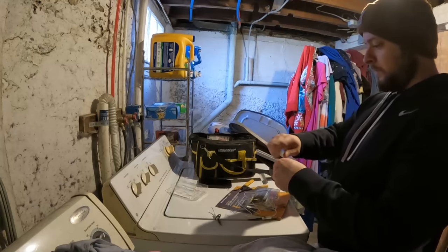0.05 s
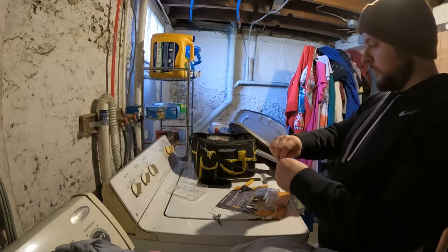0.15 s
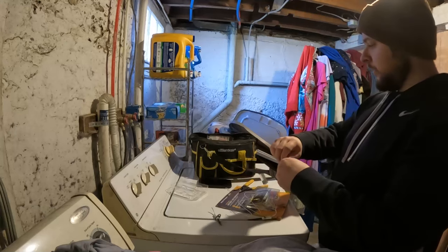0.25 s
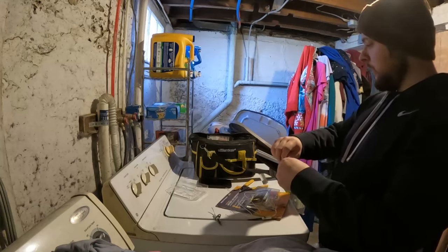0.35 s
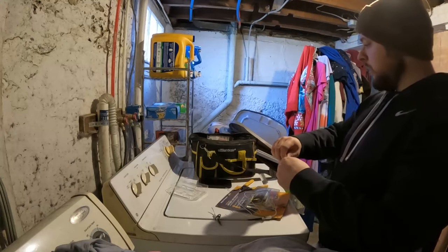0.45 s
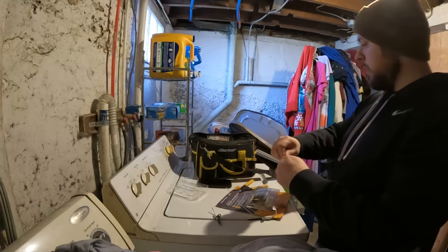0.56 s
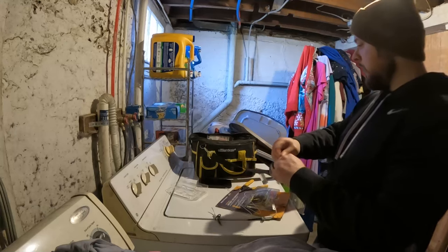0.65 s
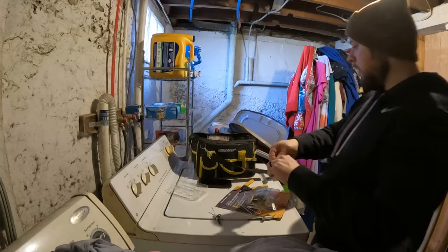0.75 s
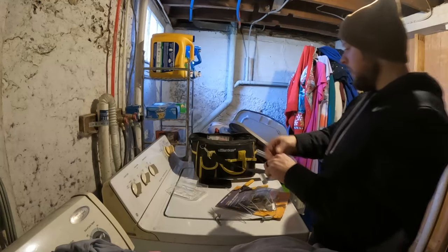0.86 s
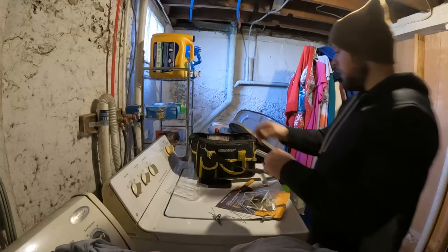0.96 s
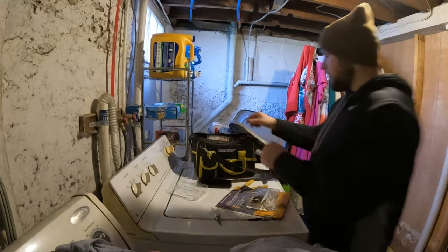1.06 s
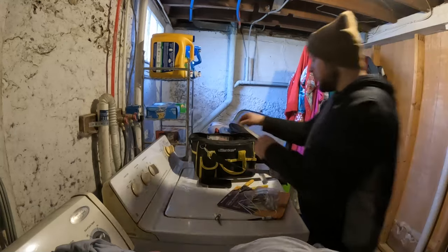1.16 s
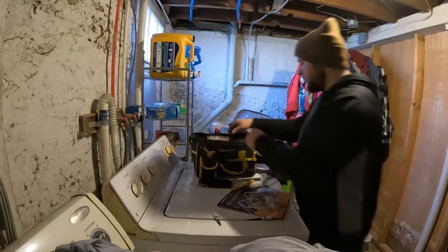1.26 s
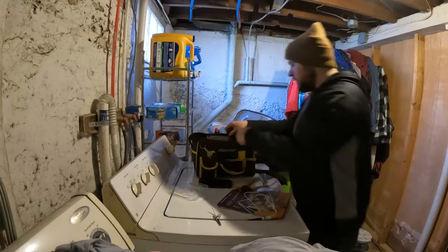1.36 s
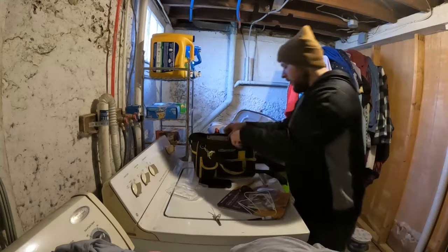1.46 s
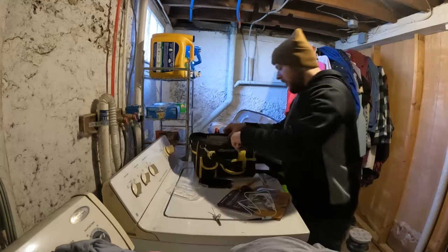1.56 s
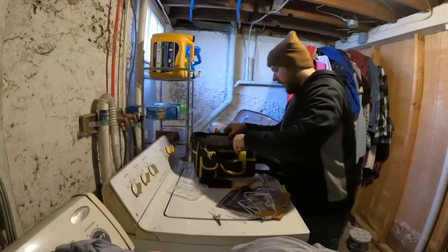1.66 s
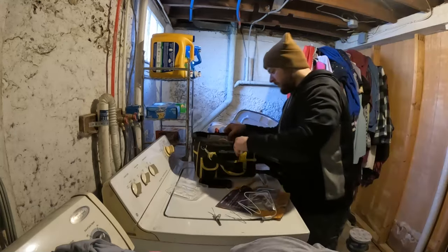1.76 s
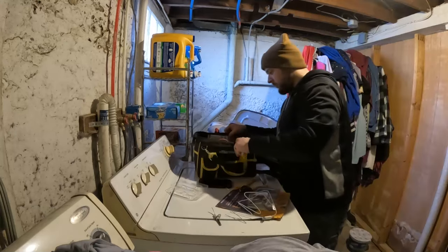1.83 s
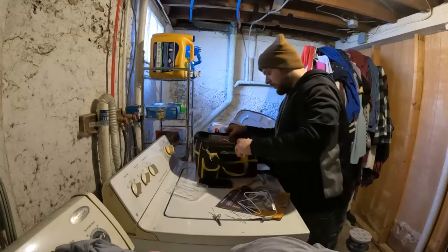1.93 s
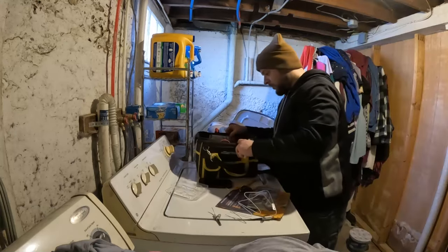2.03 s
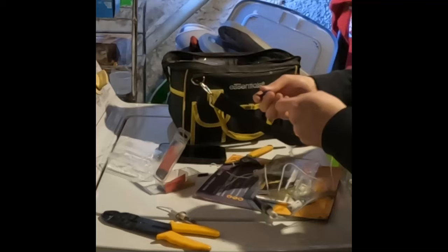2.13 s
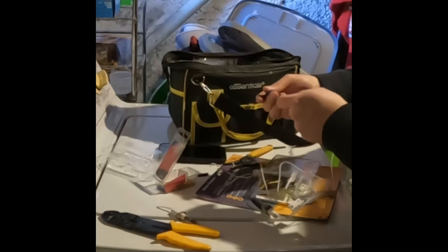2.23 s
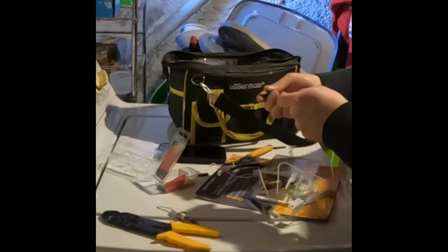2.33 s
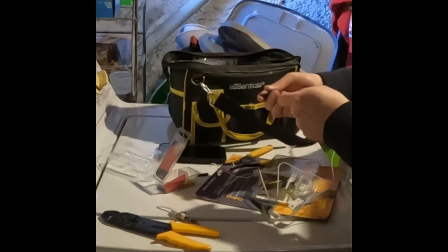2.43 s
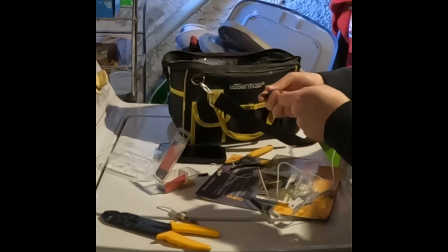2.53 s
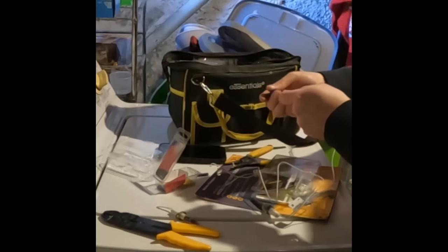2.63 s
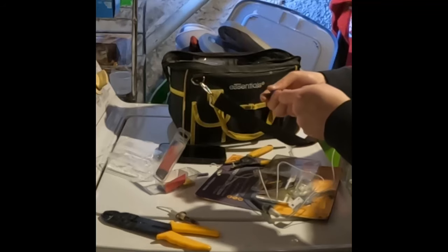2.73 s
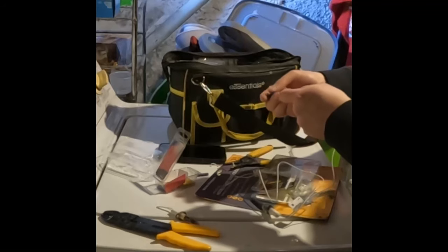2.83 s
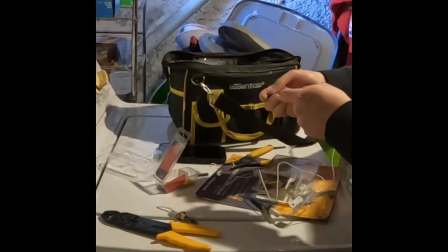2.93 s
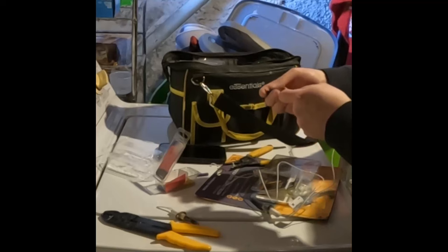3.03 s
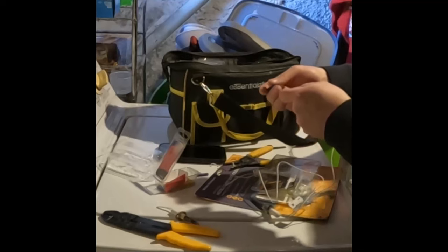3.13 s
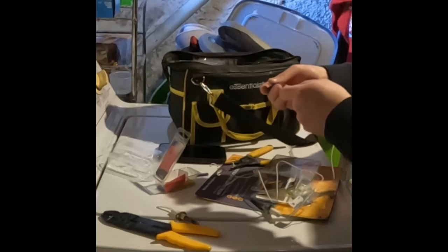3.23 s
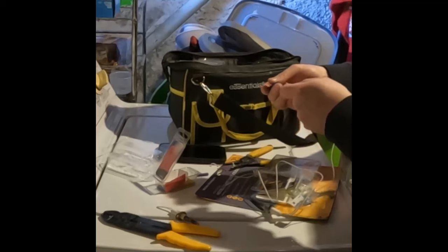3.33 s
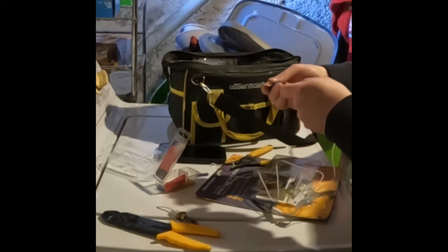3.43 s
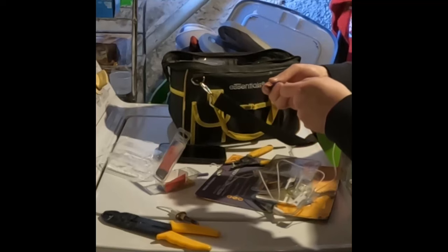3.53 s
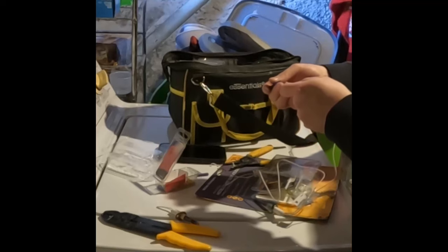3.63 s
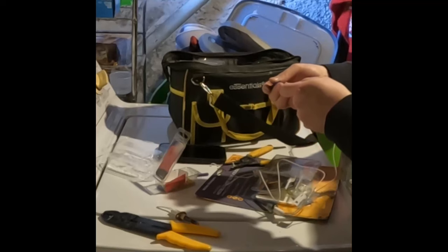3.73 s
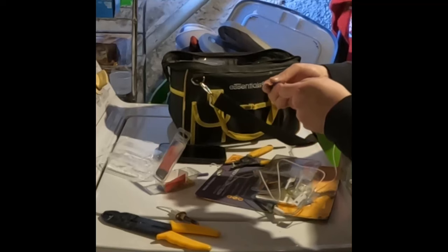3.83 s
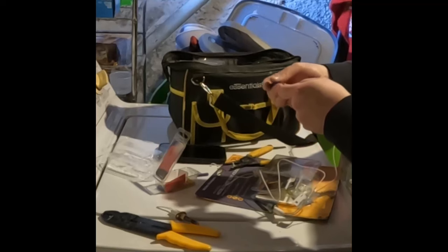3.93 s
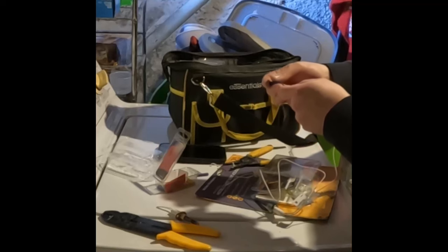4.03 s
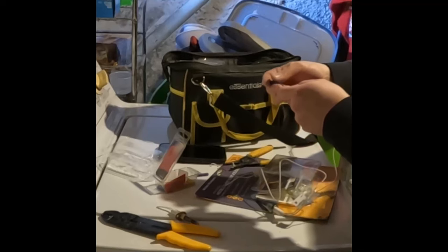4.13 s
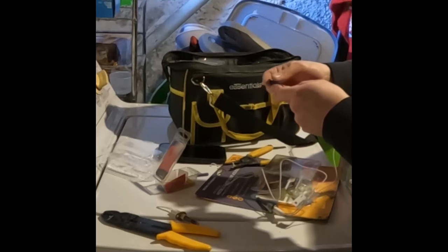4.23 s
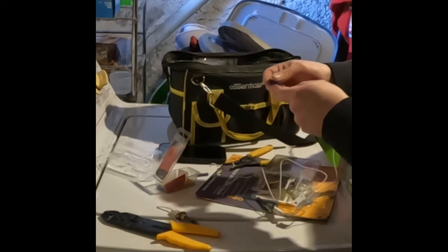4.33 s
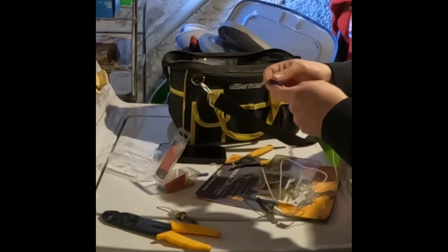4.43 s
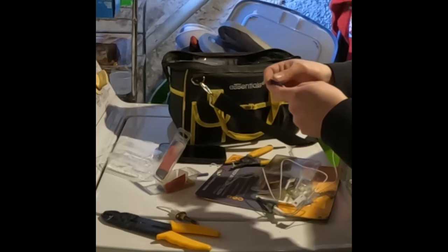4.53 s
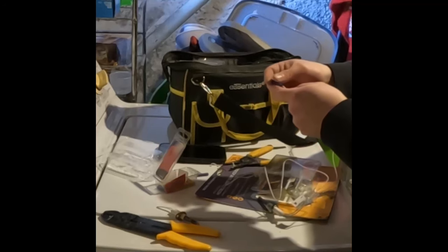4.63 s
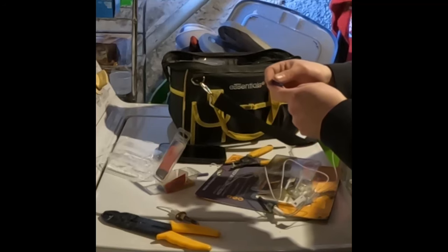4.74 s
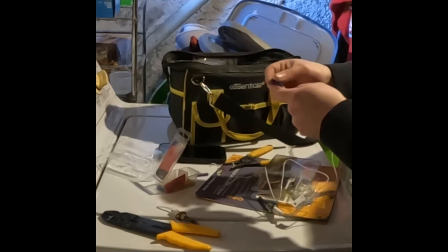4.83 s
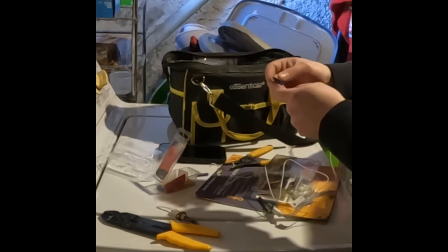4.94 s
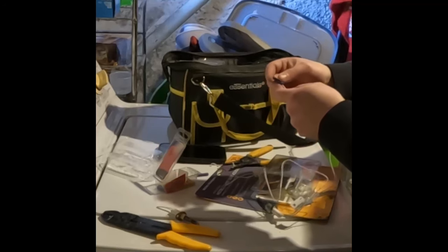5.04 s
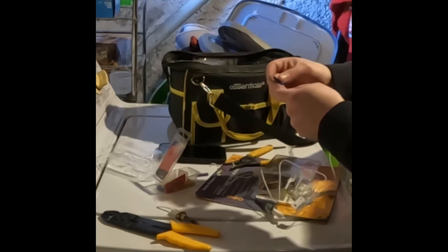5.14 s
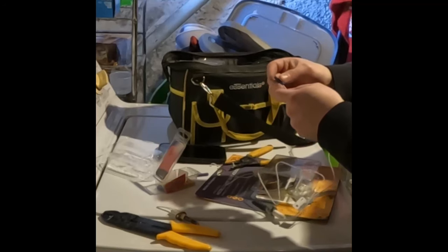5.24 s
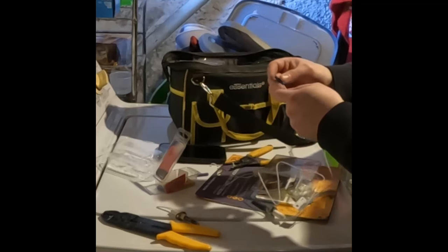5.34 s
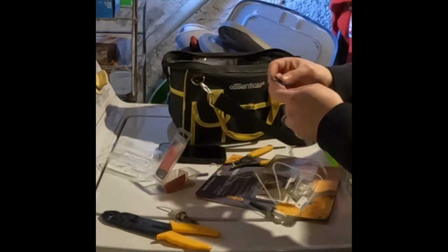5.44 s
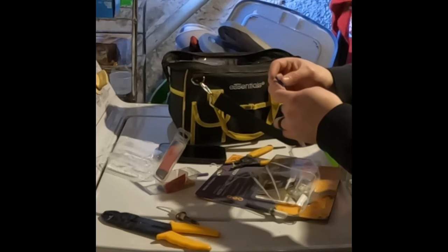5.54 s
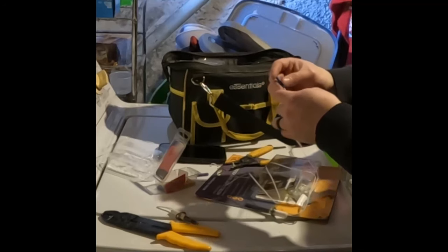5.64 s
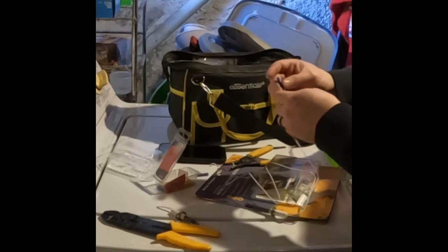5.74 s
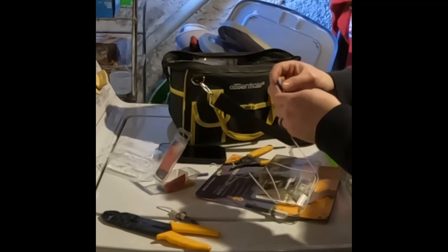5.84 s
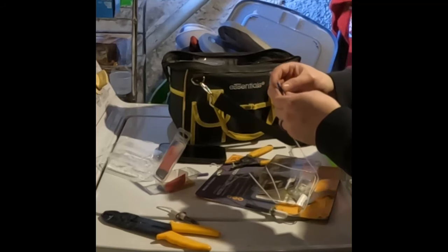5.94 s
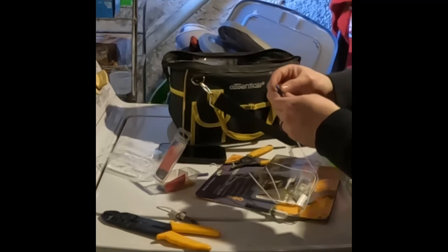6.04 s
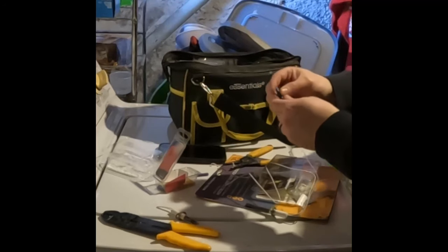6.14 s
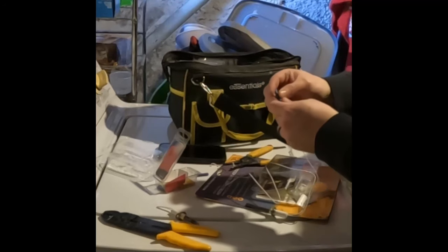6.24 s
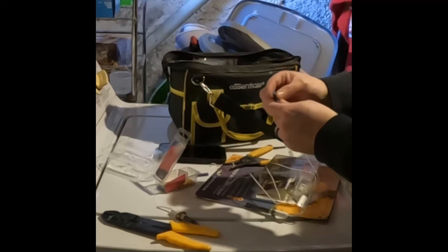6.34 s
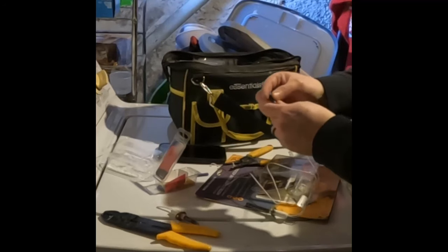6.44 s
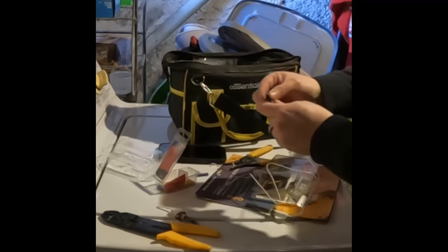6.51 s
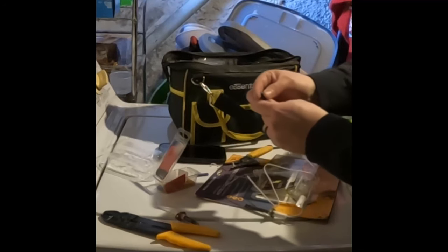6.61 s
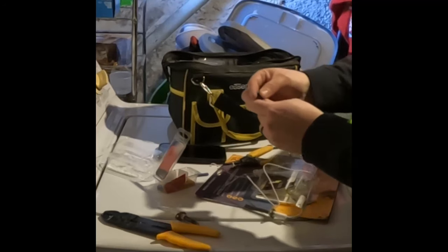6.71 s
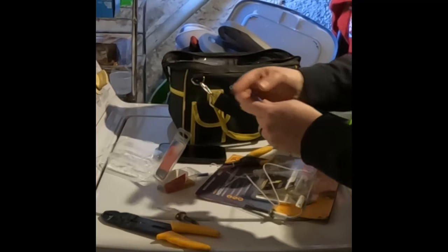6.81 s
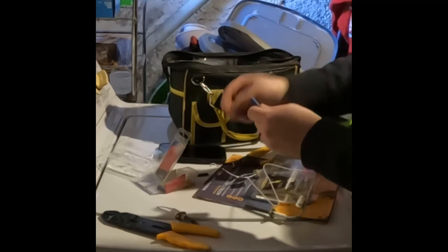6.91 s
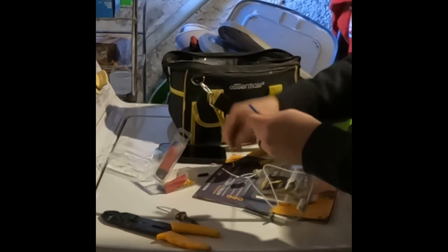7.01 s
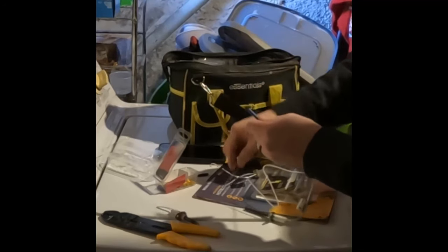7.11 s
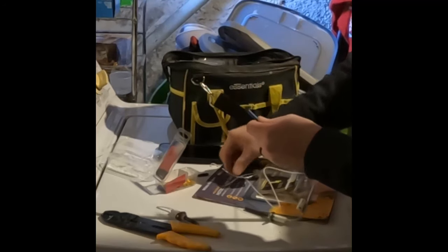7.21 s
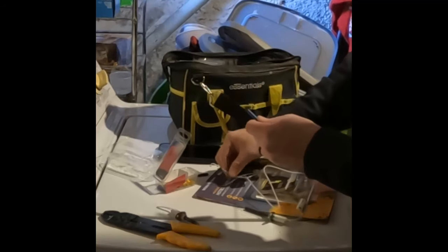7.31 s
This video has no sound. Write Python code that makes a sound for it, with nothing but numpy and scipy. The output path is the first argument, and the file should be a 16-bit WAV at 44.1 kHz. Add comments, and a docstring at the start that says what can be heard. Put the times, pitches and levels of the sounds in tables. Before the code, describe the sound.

A low ventilation drone, slightly stronger on the right, with thin hiss and occasional soft rumble fills a small hard-walled basement throughout. From 0 to 1 s sleeves swish lightly with a few faint plastic ticks. From 1.1 to 2.2 s shoes and elbows bump dully, cloth rubs hardest near 1.85 s, a brief squeak sounds, and quick plastic clicks and short wire crackles cluster until about 2.5 s. Cloth then settles. From 2.7 to 5 s there are only quiet, close ticks and faint scratchy twisting. From 5.05 to 5.6 s twisting and clicks become firmer, with tiny squeaks near 5.63 s as a light piece clatters to rest on a plastic packet, 5.66-5.77 s. After a lull, small clicks return at 6.6-6.75 s. At 7.13 s a part snaps onto a packet and the steel dryer lid booms, the loudest event, followed by a small bounce, a click at 7.26 s and a lighter one at 7.33 s.

```python
"""A low ventilation drone runs throughout a small basement, stronger on the right; sleeves swish from the start,
hardest near 1.85 s, and shoes shuffle. Close to the microphone, on a clothes dryer used as a bench, fingers twist
wire: clumps of tiny pings crackle and ring small plastic parts, which also click; brief squeaks of unsteady pitch
sound. Cloth and bumps are shaped noise. Near 5.7 s a light piece rattles to rest on a plastic packet; near 7.1 s
a part lands on a packet, booms the steel lid through its decaying modes and bounces. Walls answer near sounds."""
import sys
import numpy as np
from scipy import signal
from scipy.fft import rfft, irfft, next_fast_len
from scipy.io import wavfile

SR = 44100
rng = np.random.default_rng(int(sys.argv[2]) if len(sys.argv) > 2 else 0)


def wav_out(sig):
    """Save sig, one row per channel (or a flat mono array), as 16-bit PCM at SR to the path in sys.argv[1]."""
    wavfile.write(sys.argv[1], SR, np.round(np.clip(np.atleast_2d(sig).T, -1, 1) * 32767).astype(np.int16))


N = 325017
TIME = np.arange(N) / SR  # s
TOP_HZ = 14900  # upper band limit of the microphone, also the highest pitch of a slip

# Event levels below are taken before the trim of their layer.
# Wire strokes, and last a faint scrape just before the landing. Each row: start in seconds, length in seconds,
# crackle level in dB, body level in dB.
STROKES = [(1.61, 0.015, -48.5, -50), (2.038, .012, -57, -47), (2.108, 0.0087, -54, -43),
           (2.166, 0.019, -49, -33.5), (2.322, 0.028, -40.5, -40), (3.474, 0.1, -55.5, -56),
           (3.617, .06, -59.5, -62), (3.872, 0.0274, -66, -74), (3.922, 0.082, -66.5, -70),
           (4.064, 0.044, -68, -72.5), (4.145, 0.061, -60.5, -63), (4.223, 0.038, -53, -52.5),
           (4.655, 0.061, -61, -57.5), (4.797, 0.0434, -64, -63.5), (5.049, 0.065, -66, -64),
           (5.107, 0.084, -52, -51.5), (5.202, 0.021, -47, -49), (5.244, .022, -46.5, -42.5),
           (5.283, .068, -47.5, -50), (5.491, 0.086, -48.5, -51.5), (5.586, 0.076, -49, -48),
           (6.666, 0.082, -57.5, -48), (7.092, .034, -56, -49)]
# Small parts touching. Each row: start in seconds, ring level in dB, edge brightness in dB against the ring,
# pitch as a ratio to the usual part.
PART_CLICKS = [(0.0963, -61.5, -7, 1.2), (0.447, -57.5, -13, 1.4), (0.6516, -50.5, -16.5, 1.3),
               (1.7117, -42, 2, 1.2), (1.837, -31, -15, 1.1), (1.8573, -41.5, -16.5, 1.0),
               (1.8912, -34.5, -24.5, .7), (1.9225, -33, -14.5, .8), (1.9639, -43, -8, .9),
               (2.038, -39, -11, 1.1), (2.105, -37, -12, 1.1), (2.177, -40, -10, .8),
               (2.3021, -49.5, -1, 1.3), (2.396, -43, -20.5, 1.2), (2.4096, -38.5, -17.5, 1.1),
               (2.5123, -54, -15, 1.1), (2.7666, -57, -28, 1.1), (2.7822, -55, -29.5, 1.1),
               (3.1677, -63, 2, 1.0), (3.276, -58.5, 0, 1.0), (3.3025, -56.5, 8.5, 1.3),
               (3.4222, -66.5, 21.5, 1.0), (3.5386, -50, 2.5, 1.1), (3.6223, -58.5, -1, 1.0),
               (3.6476, -56, 4, 1.0), (3.8043, -50, -18, 1.15), (3.9297, -57.5, 4.5, 1.2),
               (4.505, -63, -6, 1.0), (4.662, -54, -6, 1.0), (5.1705, -40, -6.5, 1.0),
               (5.257, -40.5, -19, 1.05), (5.3116, -37, -4.5, 1.0), (5.4797, -57.5, 2.5, 1.0),
               (5.564, -41.5, -1.5, 1.0), (5.628, -48.5, 2, 1.3), (6.585, -52, -8, .9),
               (6.664, -44.5, -16, .9), (6.75, -49, -7, .9), (7.2561, -28.5, -31, 1.0),
               (7.3335, -39.5, -21.5, 1.3)]
# Brief friction squeaks. Each row: start in seconds, centre pitch in Hz, length in seconds, level in dB.
FRICTION_SQUEAKS = [(1.221, 5100, 0.065, -59), (1.772, 4110, 0.037, -42), (2.29, 2875, 0.051, -51),
                    (5.619, 4360, 0.026, -40), (5.642, 5070, 0.038, -43.5)]
# A light piece meeting the packet, first hit then bounces. Each row: start in seconds, level in dB.
PIECE_BOUNCES = [(5.6626, -20.5), (5.6652, -21), (5.673, -35), (5.6802, -27.5), (5.6891, -32),
                 (5.7165, -28.5), (5.737, -39), (5.754, -37.5), (5.7716, -39.5)]
# Blows on the dryer lid. Each row: start in seconds, lid level in dB, packet snap level in dB.
LID_BLOWS = [(7.125, -31.5, -19.5), (7.132, -31, -25), (7.137, -13, -28), (7.162, -54.5, -64),
             (7.2563, -36, -75)]
# Shoes and soft bumps. Each row: start in seconds, level in dB.
SOFT_BUMPS = [(1.139, -42), (1.285, -35), (1.379, -33), (1.559, -41), (1.619, -43), (1.77, -30),
              (1.846, -41), (1.916, -32), (2.106, -32.5), (2.175, -36), (3.645, -40), (5.285, -34),
              (5.674, -43)]
# How hard the sleeves move, up to the reach into the tool bag. Each row: time in seconds, effort in dB.
SLEEVE_EFFORT = [(0.0, -26.5), (0.33, -42), (0.6, -21.5), (0.96, -22.5), (1.29, -11.5), (1.51, -13.5),
                 (1.77, -8), (1.854, 1), (1.99, -7), (2.13, -12), (2.3, -23.5)]
# Swells of the low rumble. Each row: middle in seconds, length in seconds, peak level in dB.
RUMBLE_SWELLS = [(1.166, 0.195, -46), (1.857, 0.65, -46.5), (2.19, 0.11, -41), (2.5, 0.56, -52.5),
                 (2.997, 0.22, -49), (3.47, 0.298, -42), (3.709, 0.57, -51), (4.287, 0.36, -48.5),
                 (4.719, 0.28, -43), (4.914, 0.245, -46.5), (5.498, 0.81, -62), (5.942, 0.13, -54),
                 (6.623, 0.24, -43)]

# Plastic parts held in the fingers. Each row: resonance in Hz, width in Hz, relative level in dB.
PLASTIC_RESONANCES = [(929, 44, -5), (1316, 310, -3), (1700, 199.6, 1), (2134, 106, 2), (2374, 1030, -6.5),
                      (2915, 230, -2), (3317, 120, -8.5), (4370, 494, -11)]
# The packet lying on the lid. Each row: mode in Hz, relative level in dB, t60 in seconds.
PACKET_MODES = [(405, -23, 0.05), (890, -11, 0.07), (1656, -21, .025), (1850, 2, 0.034), (1950, -7, 0.026),
                (2835, 6, .012), (3500, -3, 0.0058), (4400, -6, 0.019), (5030, 1, 0.0081)]
# The dryer's steel lid. Each row: mode in Hz, relative level in dB, t60 in seconds.
LID_MODES = [(70, -23, 0.59), (155.6, -17.5, 1), (229.3, -13.5, 0.61), (237, -9, 0.15), (328, -6, 0.15),
             (391.6, -7, 0.28), (487, 0, 0.24), (690, -15, 0.29), (780, -17.5, 0.48), (1048, -8, 0.25),
             (1105, -8, 0.53), (1254, -4, 0.2), (1304, -6, 0.11), (1362.5, -9, 0.22), (1515, 0.5, 0.25),
             (1657, 6, 0.074), (1892, -1, 0.152), (2194, 4, 0.085), (2460, 2, 0.11), (2558, -5, .14),
             (2780, -2, 0.27), (3170, 8.5, 0.063), (4070, -28, 0.2)]

# Spectra of the noises. Each row: frequency in Hz, relative density in dB per Hz.
# Bright slips of a stroke, same columns.
CRACKLE_SPECTRUM = [(1760, -40), (3000, -15), (3420, -1.5), (4140, 4), (5800, -3), (6660, 1), (8240, -7.5),
                    (12200, -8.5), (14000, -21), (15500, -55)]
# Dull knock of a contact, same columns.
KNOCK_SPECTRUM = [(40, -53), (120, -12), (220, 8), (320, -3), (420, -1), (620, -6.5), (900, -10),
                  (1300, -8.5), (3000, -36)]
# Sharp edge of a click, same columns.
EDGE_SPECTRUM = [(2500, -24.5), (4500, -3), (7500, 5.5), (9000, -8), (12500, -4.5), (15500, -42)]
# Clack of the light piece, same columns.
CLACK_SPECTRUM = [(120, -53), (200, -10.5), (329, -9.5), (415, -4.5), (624, -12.5), (890, -7), (1060, -5),
                  (1340, -14), (1570, -3.5), (1850, 2.5), (2500, -7), (4330, -11), (14000, -33.5)]
# Dense wash of the steel panel, same columns.
PANEL_SPECTRUM = [(88, -35.5), (150, -16), (228, -6), (291, -2), (387, -0.5), (577, -0.5), (725, -0.5),
                  (860, -7), (1160, 0), (1310, 3.5), (2350, 1.5), (2540, 1.5), (5520, -21), (12300, -59.5),
                  (14000, -61)]
# Snap of the packet, same columns.
SNAP_SPECTRUM = [(530, -36), (900, -12), (1580, -14.5), (3220, -7.5), (4710, -7), (5770, -16), (6200, -13),
                 (7500, -10.5), (8960, -12), (9980, -6), (12200, -10.5), (14400, -27.5), (15500, -46)]
# Fine slide of the sleeves, same columns.
SWISH_SPECTRUM = [(2500, -16.5), (3800, -12.5), (5100, 5), (6200, 2), (7400, 2), (8400, -4), (12500, -10),
                  (14000, -18.5), (15000, -43)]
# Coarse rubbing of cloth, same columns.
RUB_SPECTRUM = [(180, -27), (330, -6), (500, -4.5), (700, -5.5), (1000, -3.5), (1400, 2.5), (2000, -4),
                (3000, -5.5), (4200, -8), (6000, -22), (12000, -64)]
# Soft bumps of shoes and elbows, same columns.
THUD_SPECTRUM = [(35, -12), (70, -3), (150, 3), (210, 5), (300, -8), (410, 1), (520, -10), (650, -7.5),
                 (900, -44), (2000, -32), (6000, -64)]
# Ventilation and hiss together, same columns.
AIR_SPECTRUM = [(74, -42.5), (125, -5.5), (215, -1), (296, -8), (399, -20), (433, -19.5), (498, -27),
                (573, -25.5), (945, -32), (1020, -28), (1870, -35), (2680, -41), (4790, -39), (12300, -52),
                (15000, -71)]
# Low rumble, same columns.
RUMBLE_SPECTRUM = [(12, -11.5), (20, 6.5), (35, 0.5), (55, -10), (75, -9.5), (110, -34.5), (180, -68)]

# Decay of the basement. Each row: frequency in Hz, t60 in seconds.
BASEMENT_DECAY = [(150, 0.62), (500, 0.35), (2000, 0.2), (5000, 0.063), (12000, 0.028), (15000, 0.148)]
# Colour of the two microphone ports. Each row: frequency in Hz, left against right in dB.
PORT_BALANCE = [(60, 0.5), (400, -4), (1300, -1.5), (4400, 0.9), (8000, 2.5), (15000, 3)]

# A stroke takes hold (s), builds as the wire tightens (dB) and dies away (t60, s).
GRIP_S, BUILD_DB, LET_GO_S = 0.0044, 6, 0.053
FIRM_DB = -38.5  # table level of a firm click
KNOCK_DB, KNOCK_GROWS = -4.5, 1.255  # knock against a firm click; dB of knock per dB of click
BUMP_DB = -26  # the packet knocking on the lid beneath it, before the level of each bounce
SWISH_DB, RUB_DB, RUB_GROWS = -49.5, -41.5, 1.434  # levels at 0 dB effort; rubbing grows faster than the swish
CLOTH_STOP_S = 0.25  # t60 once the arms rest
DRONE_DB, DRONE_WANDER_DB = -55.5, 0.66  # ventilation gain before left-right balance, and its wander
HISS_DB = -50.3  # gain of the upper part of the air noise
RUMBLE_DB, RUMBLE_WANDER_DB = -58.5, 0.5  # rumble at rest, and its wander


def amp(db):
    """Decibels to gain."""
    return 10 ** (np.asarray(db) / 20)


def unit(x):
    """Scaled to rms 1."""
    return x / np.sqrt(np.mean(x ** 2) + 1e-20)


def along(points, hz):
    """(Hz, value) points read on a log frequency axis."""
    f, v = np.transpose(points)
    return np.interp(np.log(hz + 1), np.log(f + 1), v)


def fade(t, t60):
    """Exponential decay, 60 dB down after t60."""
    return np.exp(-np.log(1000) * t / t60)


def wobble(rate, n=N):
    """A random curve of straight lines between normal knots, rate knots a second."""
    knots = rng.standard_normal(int(n * rate / SR) + 2)
    return np.interp(TIME[:n] * rate, np.arange(len(knots)), knots)


def filtered(x, response):
    """x times a complex response of frequency."""
    n = x.shape[-1]
    padded = next_fast_len(n + 8192)
    hz = np.fft.rfftfreq(padded, 1 / SR)
    return irfft(rfft(x, padded) * response(hz), padded)[..., :n]


def coloured(x, spectrum, size=2048):
    """Causal, minimum-phase filter of energy 1 with the given spectrum."""
    level_db = along(spectrum, np.fft.rfftfreq(size, 1 / SR))
    cepstrum = irfft(np.log(amp(level_db)))
    # folding the cepstrum forward gives minimum phase
    cepstrum[1:size // 2] *= 2
    cepstrum[size // 2 + 1:] = 0
    kernel = irfft(np.exp(rfft(cepstrum)))
    return signal.fftconvolve(x, kernel / np.linalg.norm(kernel))[:len(x)]


def add(track, s, sound):
    """Mix a sound into the track at time s."""
    part = track[round(s * SR):][:len(sound)]
    part += sound[:len(part)]


def burst(t60, attack):
    """Noise that rises quickly and dies, cut after 1.5 t60 or a quarter second."""
    t = TIME[:min(int(1.5 * t60 * SR), SR // 4)]
    return rng.standard_normal(len(t)) * fade(t, t60) * (1 - np.exp(-t / attack))


def grains(n, count, spread_db, life):
    """n samples of tiny slips, count a second, each with its own moment, size and pitch; rms 1."""
    chance = rng.random((count * n // SR, 3))
    start = (chance[:, :1] * n).astype(int)
    hz = chance[:, 1:2] * TOP_HZ
    size = amp(spread_db * np.minimum(-np.log(1 - chance[:, 2:]), 3))  # many small, few large
    t = TIME[:SR // 500]
    pings = size * np.sin(2 * np.pi * hz * t) * fade(t, life)
    places = start + np.arange(len(t))
    return unit(np.bincount(places.ravel(), pings.ravel(), n)[:n])


def ring(modes, scatter_db, attack):
    """A quarter second of decaying modes, at slightly new strengths and new phases each time."""
    t = TIME[:SR // 4]
    tones = np.zeros(len(t))
    for hz, db, t60 in modes:
        size, turn = rng.standard_normal(2)
        tones += amp(db + scatter_db * size) * fade(t, t60) * np.sin(2 * np.pi * (hz * t + turn))
    return tones * (1 - np.exp(-t / attack))


def plastic(x, grip=1):
    """The damped resonances of a small plastic part, energy 1; the grip shifts their pitch."""
    def response(f):
        h = 0
        for k, (centre, width, db) in enumerate(PLASTIC_RESONANCES):
            damping = 1j * f * width
            h = h + (-1) ** k * amp(db) * damping / ((centre * grip) ** 2 - f * f + damping)
        h = h / (1 + 1j * f / 5000)
        return h / np.sqrt(np.mean(abs(h) ** 2))
    return filtered(x, response)


def stroke(length):
    """The force of one stroke: it takes hold, builds until it is let go, and dies away."""
    t = TIME[:SR // 5]
    hold = 1 - np.exp(-t / GRIP_S)
    build = amp(BUILD_DB * np.minimum(t / length - 1, 0))
    return hold * build * fade(np.maximum(t - length, 0), LET_GO_S)


def twisting_and_scrape():
    """Wire sticks and slips in clumps that crackle and ring plastic, gripped anew; a faint scrape comes last."""
    out = np.zeros(N)
    for s, length, crackle_db, body_db in STROKES:
        grip = np.exp(0.013 * rng.standard_normal())
        force = stroke(length)
        n = len(force)
        clumps = amp(3.2 * wobble(130, n))
        slips = force * unit(grains(n, count=9000, spread_db=3.5, life=0.0015) * clumps)
        bright, dull = amp(crackle_db) * slips, amp(body_db) * slips
        add(out, s, amp(-2.0) * coloured(bright, CRACKLE_SPECTRUM))
        add(out, s, amp(-4.0) * plastic(dull, grip))
        add(out, s, amp(-11.0) * coloured(dull, KNOCK_SPECTRUM))
    return out


def clicks():
    """A contact has a plastic ring, a sharp edge set by brightness and a dull knock growing with strength."""
    knocks, bodies, edges = np.zeros((3, N))
    for s, db, bright_db, grip in PART_CLICKS:
        knock_db = FIRM_DB + KNOCK_DB + KNOCK_GROWS * (db - FIRM_DB)
        add(knocks, s, amp(knock_db) * burst(t60=0.029, attack=0.00076))
        add(bodies, s, amp(db + 0.5) * plastic(burst(t60=0.026, attack=0.00033), grip))
        add(edges, s, amp(db + bright_db + 6.5) * burst(t60=0.01, attack=0.0001))
    return coloured(knocks, KNOCK_SPECTRUM) + bodies + coloured(edges, EDGE_SPECTRUM)


def squeaks():
    """Smooth surfaces catch and sing for a moment, with an unsteady pitch around a fixed centre."""
    out = np.zeros(N)
    for s, hz, length, db in FRICTION_SQUEAKS:
        swell = np.hanning(round(length * SR))
        pitch = hz * (1 + 0.41 * rng.standard_normal(len(swell)))  # a new pitch every sample
        add(out, s, amp(db) * swell * np.sin(2 * np.pi * np.cumsum(pitch) / SR))
    return out


def dropped_piece():
    """A light piece rattles to rest on the packet; softer bounces stay longer in contact and sound duller."""
    out = np.zeros(N)
    first_db = PIECE_BOUNCES[0][1]
    for s, db in PIECE_BOUNCES:
        clack = amp(-14) * ring(PACKET_MODES, scatter_db=1, attack=0.0003)
        add(clack, 0, amp(-4.5) * coloured(burst(t60=0.026, attack=0.00024), CLACK_SPECTRUM))
        add(clack, 0, amp(BUMP_DB) * coloured(burst(t60=0.072, attack=0.0018), KNOCK_SPECTRUM))
        corner_hz = 9000 * amp(0.28 * (db - first_db))
        add(out, s, amp(db) * filtered(clack, lambda hz: 1 / (1 + 1j * hz / corner_hz) ** 2))
    return out


def landing():
    """The packet snaps; the lid rings in a few strong modes and a dense wash of weak ones, made of noise."""
    rings, washes, snaps = np.zeros((3, N))
    for s, lid_db, snap_db in LID_BLOWS:
        add(rings, s, amp(lid_db - 13.5) * ring(LID_MODES, scatter_db=1.0, attack=0.00042))
        add(washes, s, amp(lid_db - 0.5) * burst(t60=0.18, attack=0.00035))
        add(snaps, s, amp(snap_db + 23.5) * burst(t60=0.024, attack=0.012))
    return coloured(washes, PANEL_SPECTRUM) + rings, coloured(snaps, SNAP_SPECTRUM)


def clothes():
    """Fabric slides with a fine swish; harder rubbing at the tool bag adds a coarse, clumpy rustle."""
    s, effort_db = np.transpose(SLEEVE_EFFORT)
    effort = amp(np.interp(TIME, s, effort_db)) * fade(np.maximum(TIME - s[-1], 0), CLOTH_STOP_S)
    n = 3 * SR  # the arms are at rest by then
    effort = effort[:n]
    swish = rng.standard_normal(n) * amp(1.6 * wobble(90, n)) * effort
    slips = grains(n, count=9000, spread_db=1.0, life=0.0011)
    rub = slips * amp(2.62 * wobble(70, n)) * effort ** RUB_GROWS
    out = np.zeros(N)
    add(out, 0, amp(SWISH_DB) * coloured(swish, SWISH_SPECTRUM))
    add(out, 0, amp(RUB_DB) * coloured(rub, RUB_SPECTRUM))
    return out


def steps():
    """Soft, dull pushes of shoes and elbows, as slow-rising noise bursts."""
    out = np.zeros(N)
    for s, db in SOFT_BUMPS:
        add(out, s, amp(db - 3.5) * burst(t60=0.093, attack=0.0068))
    return coloured(out, THUD_SPECTRUM)


def diffuse(spectrum, side_db):
    """Stereo noise of rms 1; a lower side level makes the two close ports more alike."""
    mid, side = (coloured(rng.standard_normal(N), spectrum, size=8192) for _ in range(2))
    return unit(np.array([mid + amp(side_db) * side, mid - amp(side_db) * side]))


def background():
    """Ventilation drones on the right over a thin steady hiss and a rumble that swells now and then."""
    swells = np.zeros(N)
    for s, length, db in RUMBLE_SWELLS:
        add(swells, s - length / 2, amp(db) * np.hanning(round(length * SR)))
    at_rest = amp(RUMBLE_DB + RUMBLE_WANDER_DB * wobble(5.5))
    rumble = np.hypot(at_rest, swells) * diffuse(RUMBLE_SPECTRUM, side_db=-22)
    air = diffuse(AIR_SPECTRUM, side_db=-2.5)
    low = filtered(air, lambda hz: 1 / (1 + (hz / 450) ** 4))
    left_right = amp([[-2.8], [1.6]])
    drone = amp(DRONE_DB + DRONE_WANDER_DB * wobble(2.2)) * low * left_right
    return rumble + drone + amp(HISS_DB) * (air - low)


def room(x, wet_db, side_db):
    """Direct sound plus the basement walls: a half second of decaying noise with sparse early echoes."""
    hz, t, z = signal.stft(rng.standard_normal((2, SR // 2)), SR, nperseg=256)
    decay = fade(t, along(BASEMENT_DECAY, hz)[:, None])
    tail = signal.istft(z * decay, SR, nperseg=256)[1]
    age = np.arange(tail.shape[1]) / SR
    tail *= 1 - np.exp(-age / 0.00024)
    echoes = rng.random(tail.shape) < 500 / SR  # about 500 a second
    tail += 9 * echoes * fade(age, 0.13)
    tail /= np.linalg.norm(tail[0])
    mid, side = signal.fftconvolve(x[None], tail, axes=1)[:, :N]
    return x + amp(wet_db) * np.array([mid + amp(side_db) * side, mid - amp(side_db) * side])


def scene():
    """Hands, body and dryer in the droning basement, each with its own share of the room."""
    lid, packet = landing()
    near = twisting_and_scrape() + clicks() + squeaks() + dropped_piece()
    hands = room(near, wet_db=-3.5, side_db=-4.5)
    body = room(clothes() + steps(), wet_db=-6, side_db=-3)
    dryer = room(lid, wet_db=-6.5, side_db=-7.5) + room(packet, wet_db=-8.5, side_db=0)
    return hands + body + dryer + background()


def record(dry):
    """Two close ports of slightly unlike colour, the left slightly late, and the band limit."""
    sides = np.array([[0.5], [-0.5]])

    def microphone(hz):
        colour = amp(sides * along(PORT_BALANCE, hz))
        delay = np.exp(-2j * np.pi * hz * sides * 0.577 / SR)  # 0.577 samples between the ports
        return colour * delay / np.sqrt(1 + (hz / TOP_HZ) ** 80)
    return filtered(dry, microphone)


dry = scene()
out = record(dry)
wav_out(out)
```